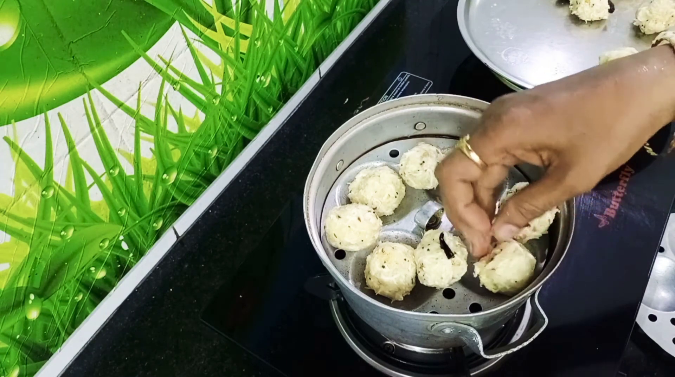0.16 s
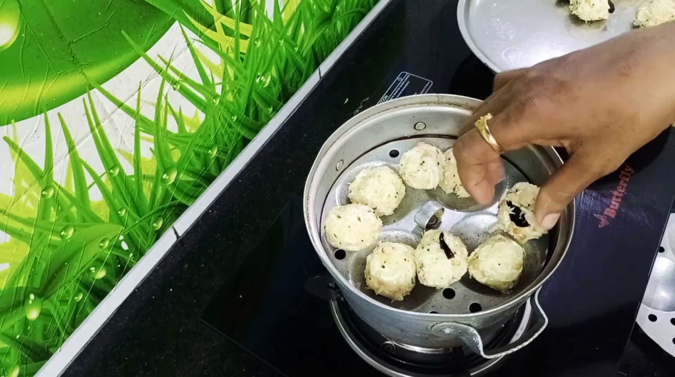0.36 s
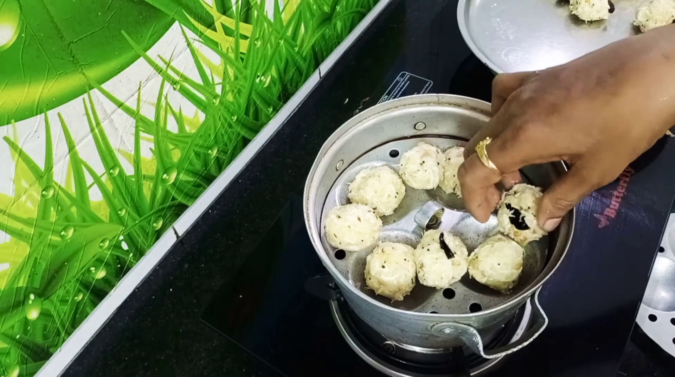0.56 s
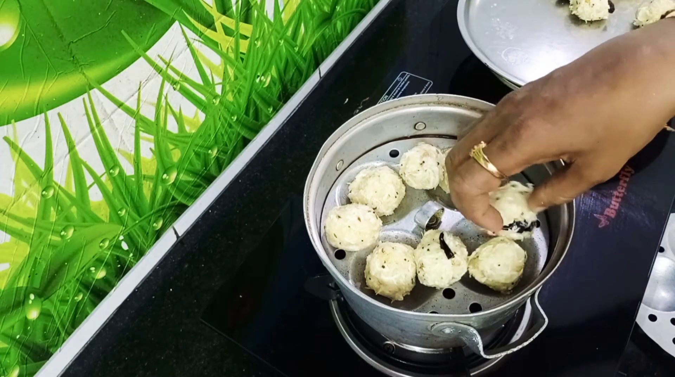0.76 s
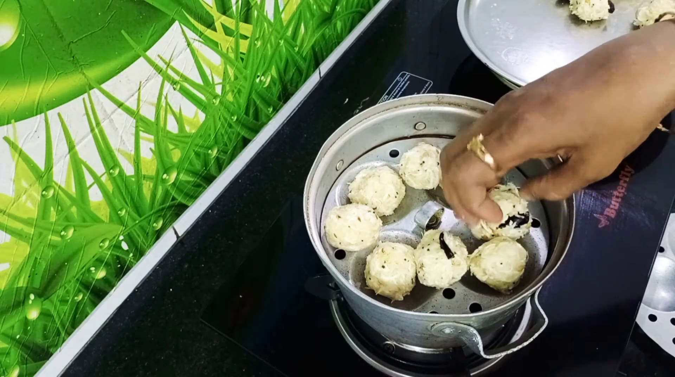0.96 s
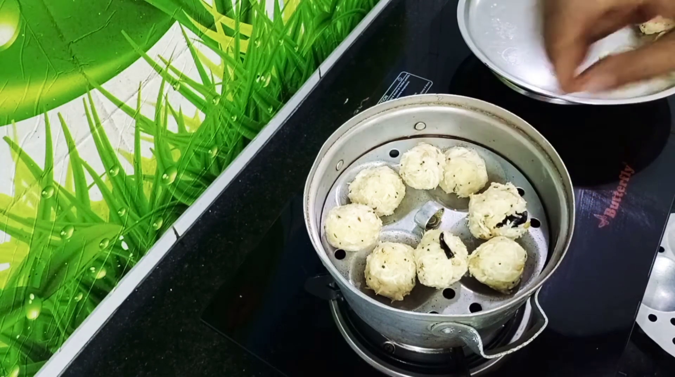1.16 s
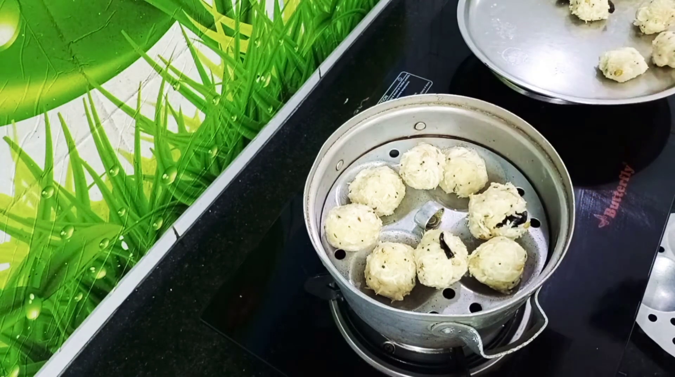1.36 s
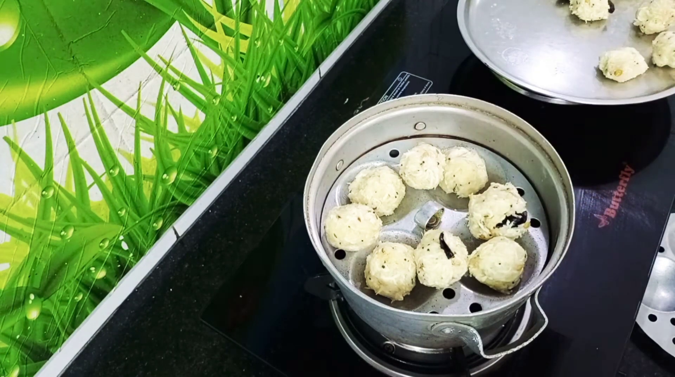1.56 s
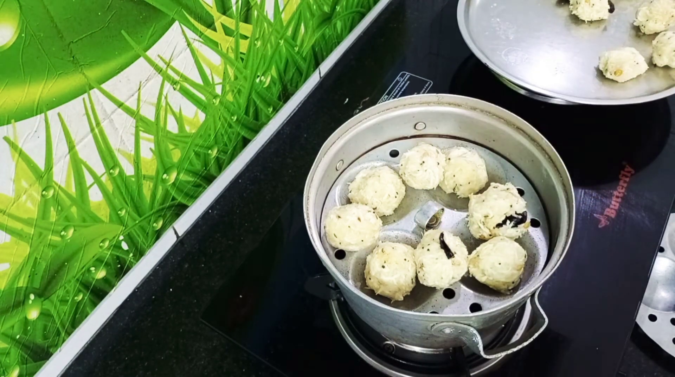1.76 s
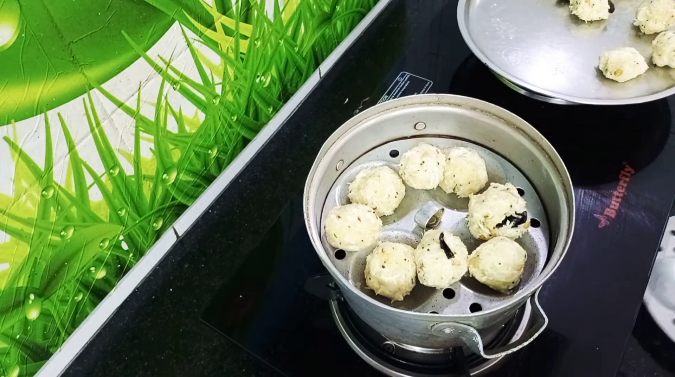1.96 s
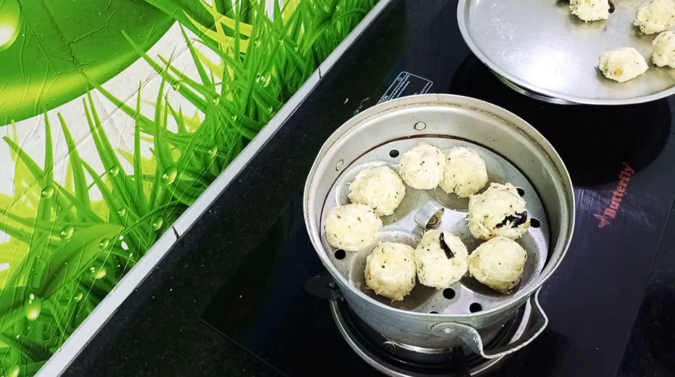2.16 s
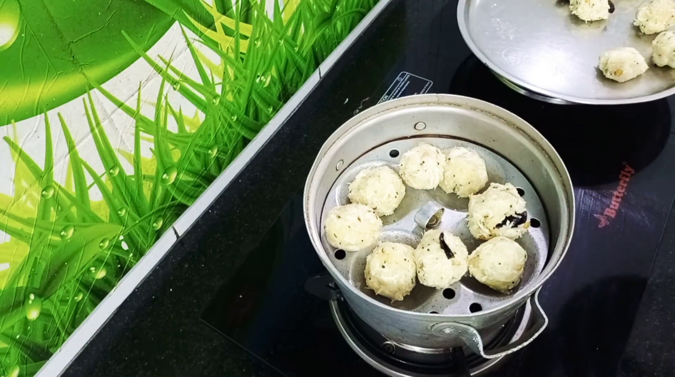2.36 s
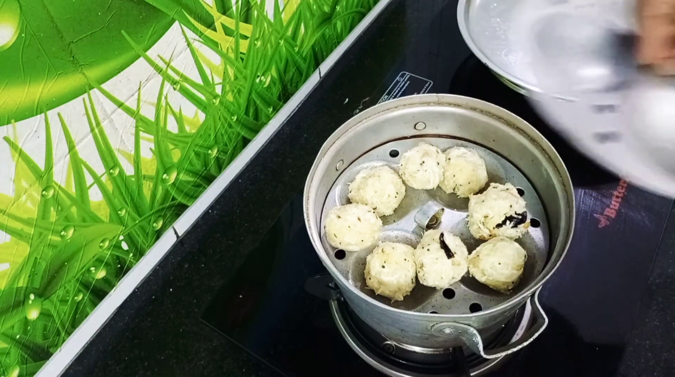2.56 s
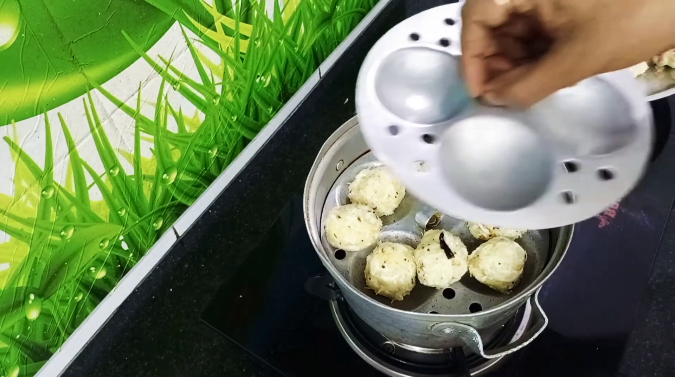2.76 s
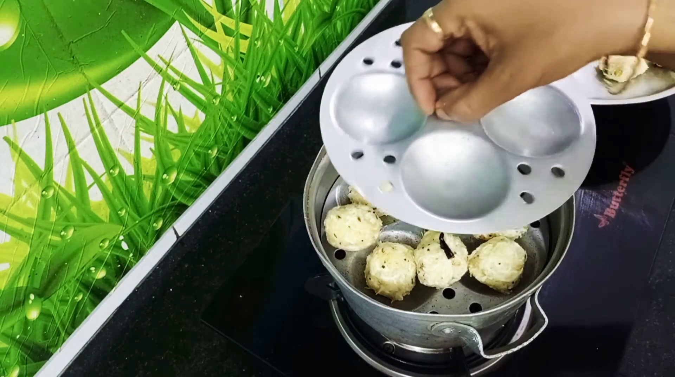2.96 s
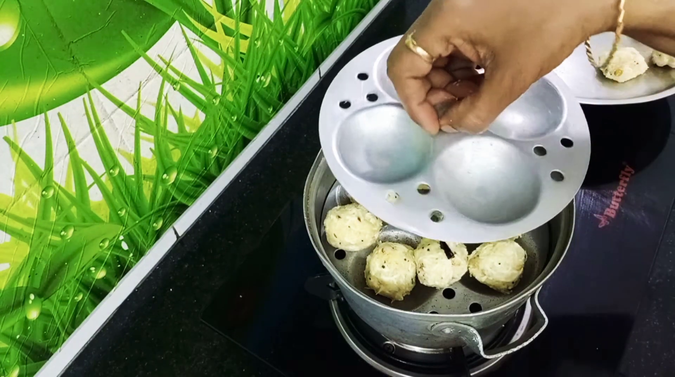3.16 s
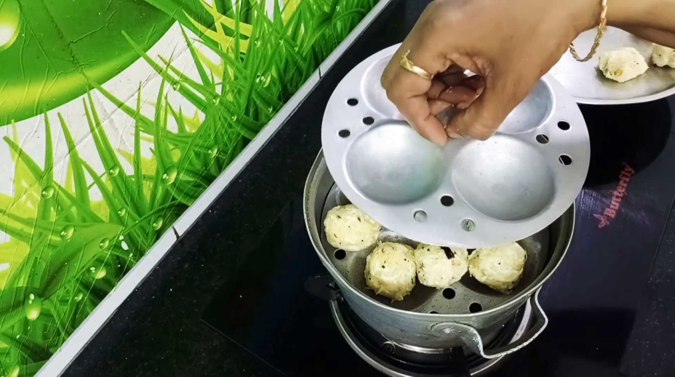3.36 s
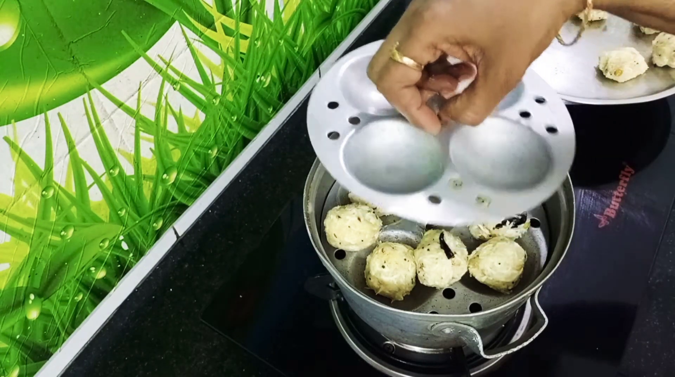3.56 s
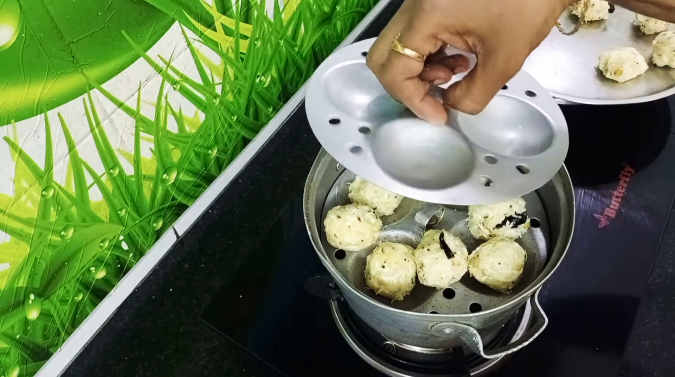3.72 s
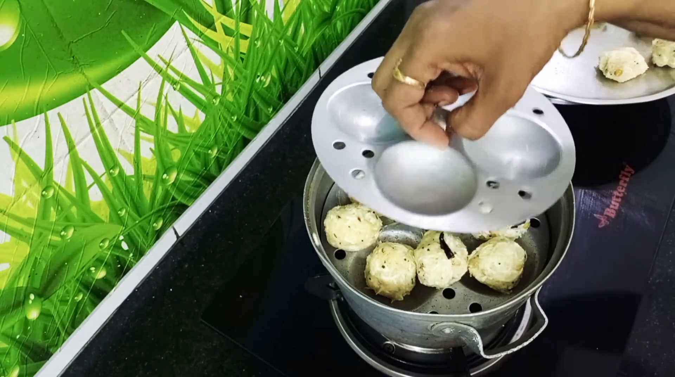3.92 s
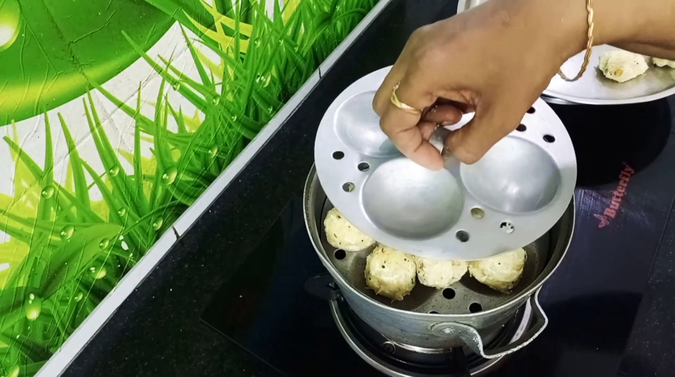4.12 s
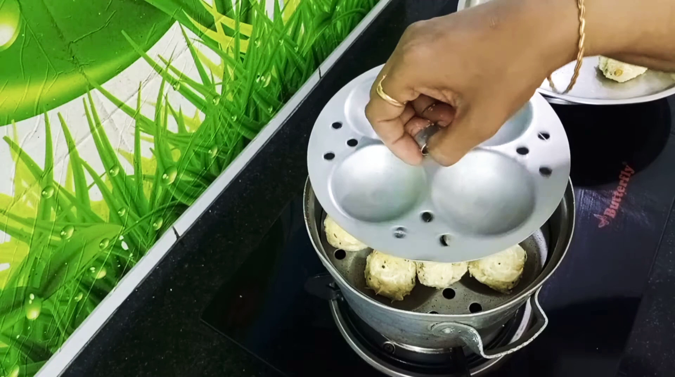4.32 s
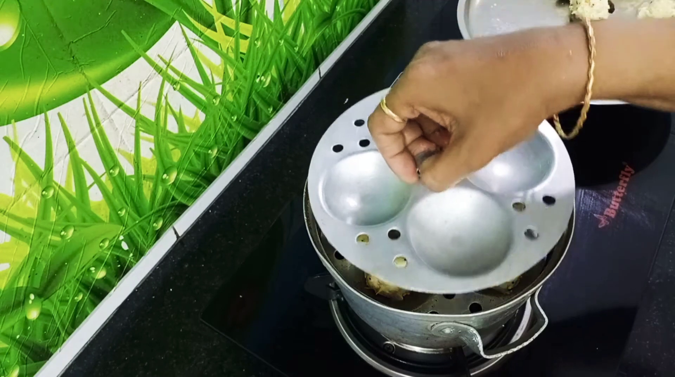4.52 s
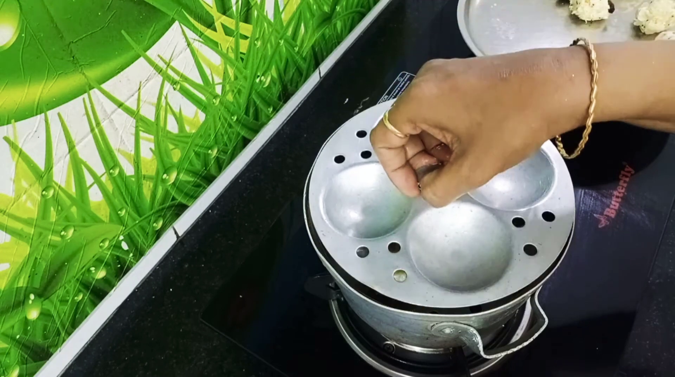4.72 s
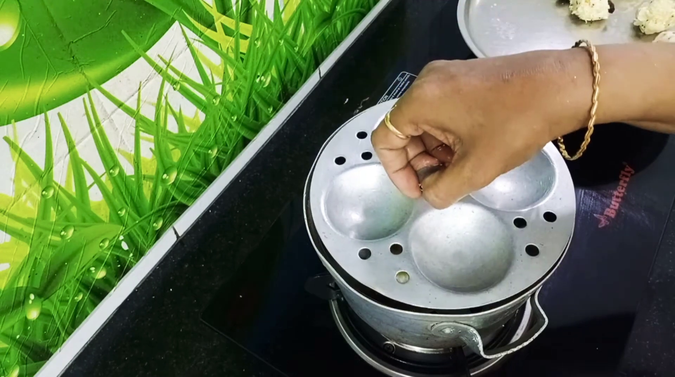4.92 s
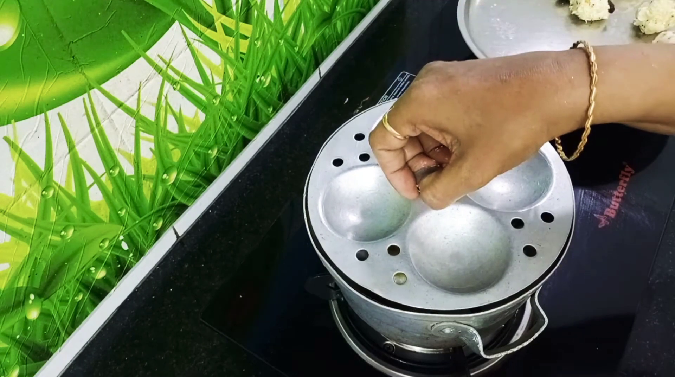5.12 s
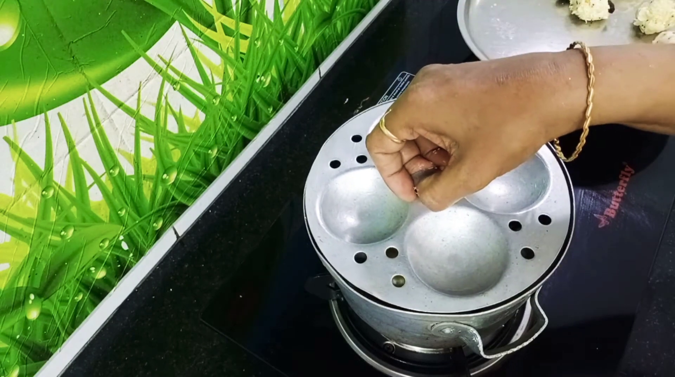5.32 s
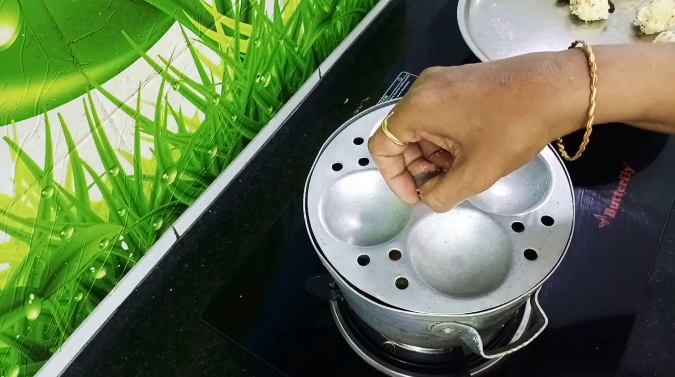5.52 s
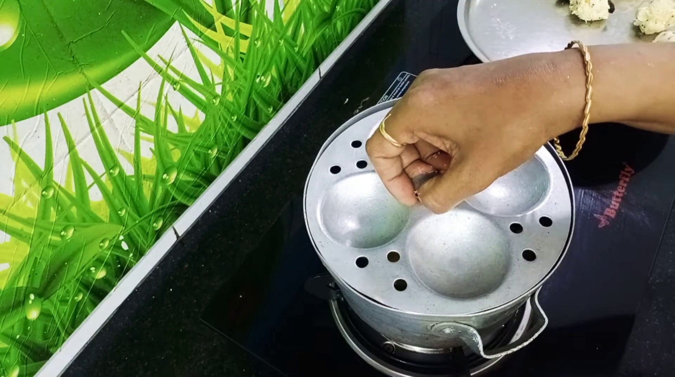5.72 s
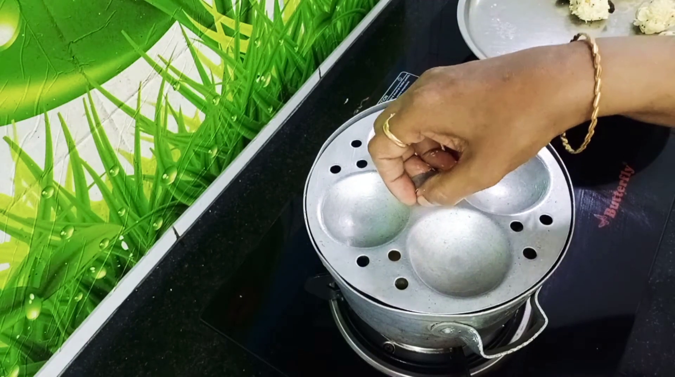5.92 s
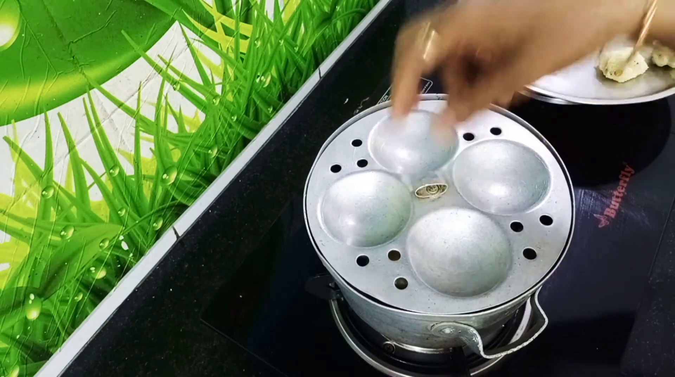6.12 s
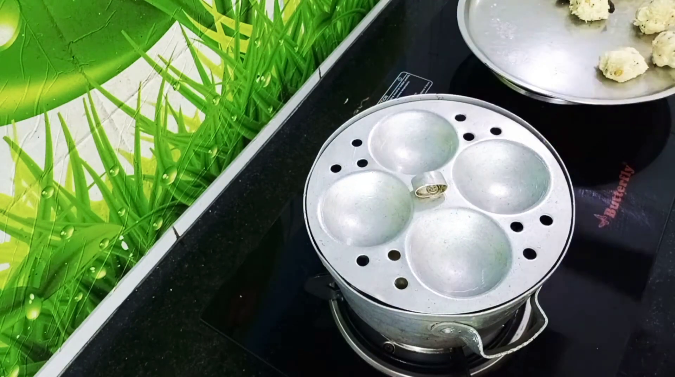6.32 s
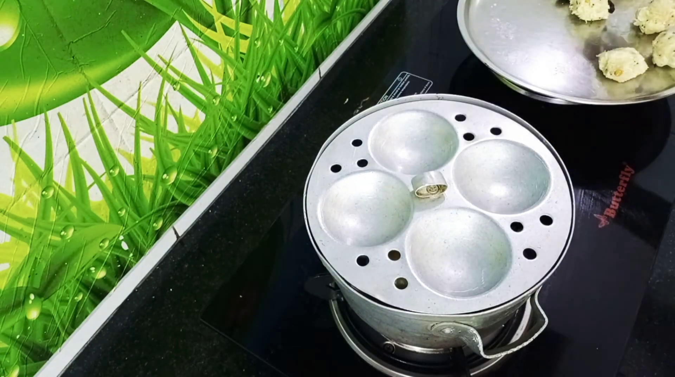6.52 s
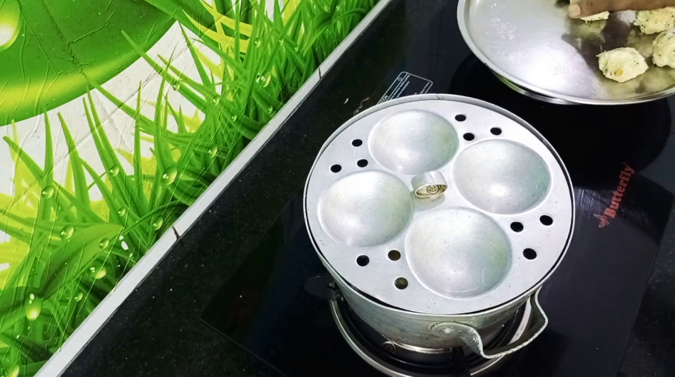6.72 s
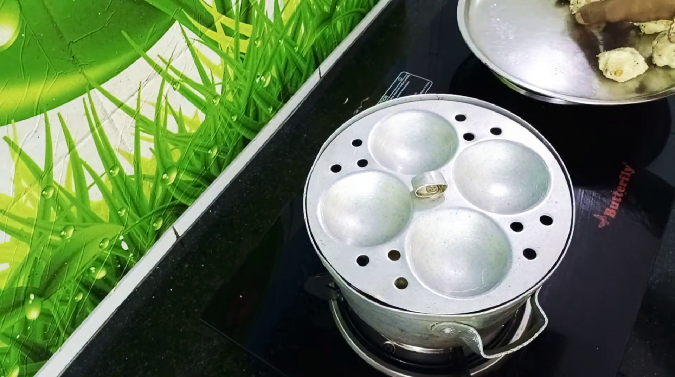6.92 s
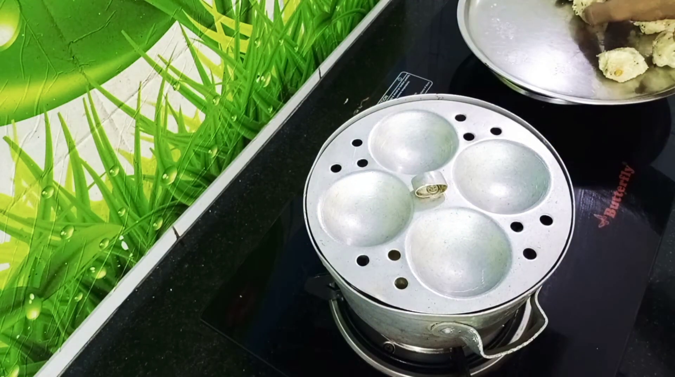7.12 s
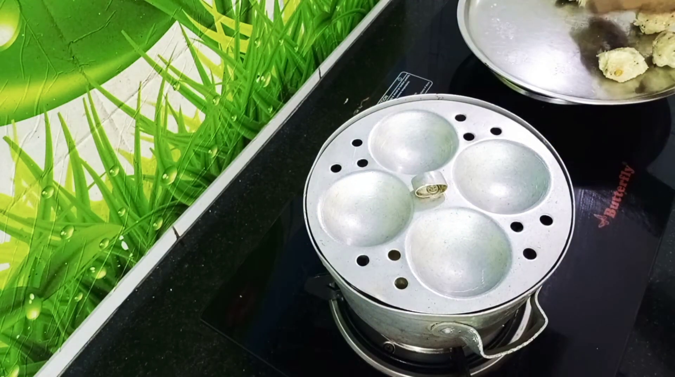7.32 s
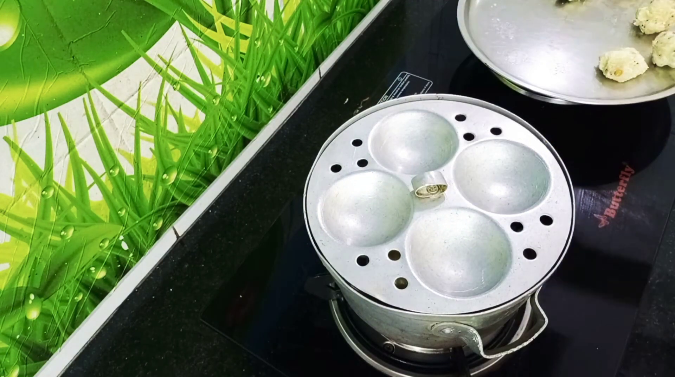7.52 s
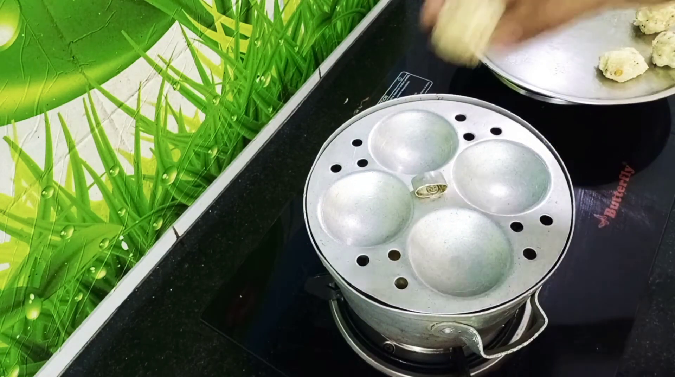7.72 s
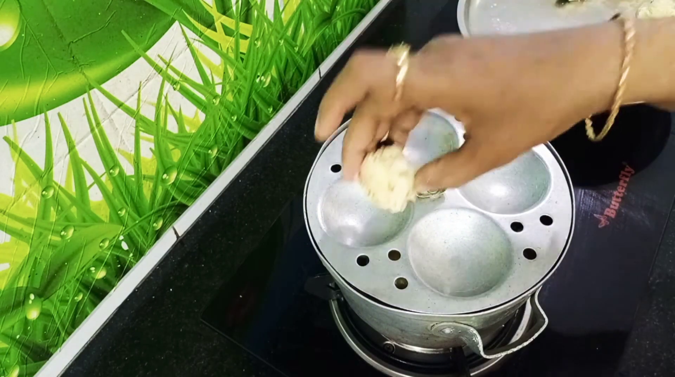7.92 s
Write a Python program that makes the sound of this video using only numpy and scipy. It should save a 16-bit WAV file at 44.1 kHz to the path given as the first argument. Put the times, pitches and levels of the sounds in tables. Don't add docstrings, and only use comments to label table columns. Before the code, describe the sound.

In a quiet kitchen, sheet metal rings out sharply, lands on a pot with a shorter clank, and is nudged into place with small knocks.

```python
import sys
import numpy as np
from scipy import signal
from scipy.fft import rfft, irfft, next_fast_len
from scipy.io import wavfile
from scipy.ndimage import uniform_filter1d

SR = 44100
rng = np.random.default_rng(int(sys.argv[2]) if len(sys.argv) > 2 else 0)


def how_loud(loudness_db):
    steps = np.asarray(loudness_db, float) / 20
    return 10 ** steps


def put_to_file(sound):
    columns = np.atleast_2d(sound).T
    safe = np.clip(columns, -1, 1)
    whole_steps = np.round(safe * 32767)
    wavfile.write(sys.argv[1], SR, whole_steps.astype(np.int16))


N = 351735

# frequency in Hz, level in dB per Hz.
FREE_OVERTONES = [(60, -49.5), (110, -31), (250, -29), (400, -18), (630, -25.5), (800, -13), (1100, -26),
                  (1400, -9), (2500, -13.5), (3320, -20.5), (3700, -18.5), (7700, -11.5), (8200, -20.5),
                  (15500, -29)]
# frequency in Hz, level in dB per Hz.
RIM_OVERTONES = [(60, -44.5), (110, -25.5), (420, -42.5), (580, -8), (900, -26), (1250, -29), (1500, -10),
                 (2000, -7), (2900, -22.5), (3300, -8.5), (3600, -19.5), (7500, -16), (8300, -34),
                 (15500, -27.5)]


def evened(x):
    return x / np.sqrt(np.mean(x ** 2) + 1e-20)


def read(points, hz):
    f, value = np.transpose(points)
    return np.interp(np.log(hz + 1), np.log(f + 1), value)


def add(mix, s, sound):
    part = mix[round(s * SR):][:len(sound)]
    part += sound[:len(part)]


def resonate(x, hz, width):
    turn = np.exp(2j * np.pi * np.cumsum(hz * np.ones(len(x))) / SR)
    r = np.exp(-np.pi * width / SR)
    return 2 * (turn * signal.lfilter([1 - r], [1, -r], x / turn)).real


def resonate_twice(x, hz, width):
    return resonate(resonate(x, hz, width), hz, width)


def coloured(points, count):
    hz = np.fft.rfftfreq(count, 1 / SR)
    return evened(irfft(rfft(rng.standard_normal(count)) * how_loud(read(points, hz)), count))


def dying(x, t60s):
    hz, t, z = signal.stft(x, SR, nperseg=256)
    decay = how_loud(-60 * t / read(t60s, hz)[:, None])
    return signal.istft(z * decay, SR, nperseg=256)[1][..., :x.shape[-1]]


def smoothed(z, bins, frames):
    return uniform_filter1d(uniform_filter1d(z, bins, 0), frames, 1)


def patchy(frames, depth_db):
    a, b, patches = rng.standard_normal((frames, 513, 3)).T
    return (a + 1j * b) * how_loud(depth_db * evened(smoothed(patches, 6, 9)))


def steam_and_air():
    # frequency in Hz, level in dB per Hz.
    air = [(100, -25), (180, -17), (300, -15.5), (600, -25), (1000, -23), (5600, -36.5), (9000, -41.5),
           (15300, -38)]
    # frequency in Hz, level in dB per Hz.
    hiss = [(5900, -37.5), (6300, -8), (7050, -1), (7700, -8.5), (8100, -19.5), (8700, -50)]
    # time in seconds, level in dB.
    hiss_level = [(0.0, -73.5), (2.131, -70.5), (2.27, -65.5), (2.69, -72), (4.24, -72.5), (4.69, -70),
                  (5.64, -69), (6.28, -73), (6.69, -70.5), (7.98, -71)]
    gusts_db = 1.5
    frames, hz = N // 256 + 5, np.fft.rfftfreq(1024, 1 / SR)[:, None]
    hiss_level_db = np.interp(np.arange(frames) * 256 / SR, *np.transpose(hiss_level))
    gusts = evened(smoothed(rng.standard_normal((frames, 513)).T, 14, 20))
    steam = how_loud(read(hiss, hz) + hiss_level_db + 18.0 + gusts_db * gusts)
    steam = steam * (hz > 5900) * (hz < 8700)
    z = patchy(frames, 1.0) * np.hypot(how_loud(read(air, hz) - 43.0), steam) * how_loud(-29.5)
    return signal.istft(z, nperseg=1024, noverlap=768)[1][:N]


def hum():
    # frequency in Hz, level in dB per Hz.
    spectrum = [(30, -46), (55, -35.5), (75, -8), (90, 0), (112, 0.5), (160, -9), (260, -24), (400, -50)]
    # time in seconds, level in dB.
    load = [(0.0, -80), (1.26, -75), (1.78, -76.5), (2.06, -70), (2.2, -74.5), (2.42, -80.5), (3.08, -77.5),
            (3.53, -79.5), (4.22, -77.5), (4.53, -77.5), (4.88, -76.5), (5.39, -84), (5.77, -77),
            (6.37, -73), (6.75, -78.5), (7.26, -76.5), (7.48, -77.5), (7.97, -77.5)]
    lumps_db = 2
    lumps = evened(uniform_filter1d(uniform_filter1d(rng.standard_normal(N), 2000), 2000))
    load_db = np.interp(np.arange(N) / SR, *np.transpose(load))
    return coloured(spectrum, next_fast_len(N))[:N] * how_loud(load_db + 1.5 + lumps_db * lumps)


def fan():
    return how_loud(-87) * evened(resonate(rng.standard_normal(N), 506.6, 5.8))


def brushes():
    # frequency in Hz, level in dB.
    lift_rings = [(1596, -61), (2833, -66.5), (3650, -68.5), (4600, -71), (5450, -68.5), (6225, -62)]
    # start in seconds, length in seconds, frequency in Hz, level in dB.
    rubs = [(2.012, .03, 3399, -59.5), (2.031, 0.049, 3642, -62), (2.502, 0.08, 3850, -72),
            (2.605, .09, 3530, -67), (2.614, .08, 3730, -67), (3.035, .1, 3500, -68),
            (3.049, .1, 3720, -66), (4.255, 0.089, 3550, -63), (4.511, 0.15, 3520, -65.5),
            (5.035, 0.1, 3593, -60), (5.515, 0.1, 3670, -66.5), (5.728, 0.052, 3453, -63)]
    # start in seconds, length in seconds, frequency in Hz, level in dB.
    touches = [(1.17, 0.062, 1604, -73.5), (1.51, 0.073, 5500, -76), (.54, .07, 3500, -74),
               (3.52, .08, 5500, -79), (7.53, .06, 3500, -78), (7.53, .06, 5500, -77),
               (2.63, .08, 1028, -77), (4.509, .05, 4600, -73.5), (4.99, 0.13, 5470, -72.5),
               (5.521, .05, 249, -62), (5.772, 0.072, 106.4, -58), (6.657, 0.11, 331, -67),
               (6.945, .045, 1535, -71), (7.015, .05, 1540, -70), (7.06, .1, 1530, -73),
               (6.515, .07, 495, -67), (4.97, 0.15, 570, -66), (7.53, 0.22, 1190, -73),
               (7.66, 0.13, 1070, -73), (7.76, 0.14, 1160, -73), (7.86, .11, 1040, -73)]
    lift_s, lift_length_s, lift_lag_s, lift_shorten = 1.94, 0.059, 0.015, 0.5
    out, lift = np.zeros(N), []
    lowest_hz = lift_rings[0][0]
    for hz, db in lift_rings:
        start = lift_s + lift_lag_s * np.log(hz / lowest_hz)
        lift.append((start, lift_length_s * (lowest_hz / hz) ** lift_shorten, hz, db))
    for s, length, hz, db in list(lift) + list(rubs) + list(touches):
        noise, count = rng.standard_normal(SR // 4), round(length * SR)
        tone = evened(resonate_twice(noise, hz, 30 + 0.03 * hz))[-count:]
        stroke = signal.windows.tukey(count, .5) * how_loud(-8 * np.arange(count) / count)
        add(out, s, how_loud(db) * tone * stroke)
    return out


def ticks():
    # start in seconds, peak level in dB, centre frequency in Hz.
    rebounds = [
        (2.0972, -16, 7800),
        (2.0988, -21, 7800),
        (4.7415, -19, 6800),
        (4.7492, -27, 7500),
        (4.7594, -27, 7000),
        (4.7695, -23, 6500),
        (4.7762, -31, 7000),
        (5.5315, -42, 1800),
        (5.7135, -38, 6500),
        (1.082, -66, 14000),
    ]
    decay_s, width_hz = .0005, 3200
    out, t = np.zeros(N), np.arange(400) / SR
    for s, db, hz in rebounds:
        click = np.gradient(rng.standard_normal(len(t)) * np.exp(-t / decay_s))
        click = resonate_twice(click, hz, width_hz)
        add(out, s, how_loud(db) * click / abs(click).max())
    return out


def knock(blows, modes, overtones, split, hold):
    # frequency in Hz, t60 in seconds.
    crack_t60 = [(200, 0.11), (1000, 0.021), (4000, 0.023), (9000, 0.045), (15000, 0.028)]
    wobble_rad, wobble_per_s = 1.4, 14
    out, full = np.zeros((2, N)), np.arange(round(1.6 * SR)) / SR
    rise = 1 - np.exp(-full / 0.00082)
    for s, blow_db, crack_db, choke_db in blows:
        after = out[:, round(s * SR):][:, :len(full)]
        after *= how_loud(choke_db * np.minimum(full / .002, 1))
        if blow_db < -90:
            continue
        for (hz, db, t60), (turn, twin, sway, lag, near) in zip(modes, rng.random((len(modes), 5))):
            t60 = t60 * hold
            t = full[:round(SR * t60 * min(1 + (blow_db + db + 25) / 100, 1))]
            flex = np.sin(2 * np.pi * (wobble_per_s * (.5 + near) * t + sway))
            flex = (split > .001) * wobble_rad * np.minimum(3 * t / t60, 1) * flex
            pair = np.sin(2 * np.pi * hz * t + flex)
            pair += 0.33 * np.sin(2 * np.pi * (hz * (1 + split * (twin - .5)) * t + turn))
            third = np.sin(2 * np.pi * (hz * (1 + 4 * split * (near - .5)) * t + lag))
            pair += 0.4 * third * how_loud(-30 * t / t60)
            swing = (0.13 + sway) * 0.31 * np.sqrt(hz) * t * (1 + 0.5 * t)
            swing_db = 3.5 * np.sin(2 * np.pi * (swing + lag)) * min(hz / 2200, 1)
            hard_db = 0.036 * blow_db * hz / 1000
            level_db = blow_db + db + hard_db + swing_db - 60 * t / t60
            add(out[0], s, rise[:len(t)] * how_loud(level_db) * pair)
        crack = dying(coloured(overtones, SR // 4), crack_t60)
        add(out[1], s, how_loud(crack_db) * rise[:SR // 4] * crack)
    return out


def free_plate():
    # time in seconds, blow in dB, crack in dB, change of the earlier ring in dB.
    blows = [
        (2.0925, -3, -16.5, 0),
        (2.0965, -33, -31, 2),
        (2.144, -36.5, -23, 3),
        (2.18, -99, -99, -1),
        (2.47, -99, -99, -9),
    ]
    # frequency in Hz, level in dB, t60 in seconds.
    modes = [(380, -45, .4), (745, -31, .13), (778, -29, 0.33), (935, -45, .4), (1272, -41, 0.45),
             (1326, -24, 0.36), (1343, -29, .5), (1383, -40, 0.45), (1408, -34, .38), (1581.4, -35, 0.75),
             (1584, -40, .7), (1365, -36, .4), (1700, -45, .3), (1836, -47, .35), (2290, -46, .3),
             (2972, -48, .3), (3545, -52, .5), (3650, -54, .8), (4081, -47, .3), (4716, -48, .4),
             (4872, -54, .35), (1766, -40, 0.55), (2778, -29, 0.26), (2848, -29, 0.47), (3740, -35, 0.52),
             (3856, -43, 0.55), (4161, -43, 0.4), (4366, -35, 0.37), (4655, -30, 0.52), (5342, -41, 0.39),
             (5519, -36, 0.45), (5593, -46, 0.4), (6165, -26, 0.26), (6498, -34, 0.4), (6534, -31, 0.49),
             (7104, -35, 0.42), (7160, -42, 0.55), (7438, -34, 0.36), (7851, -36, 0.37), (7889, -33, 0.37),
             (8426, -43, 0.41), (8469, -42, 0.44), (8625, -44, 0.4), (9074, -48, 0.42), (9118, -47, 0.45),
             (9344, -50, 0.46), (9760, -46, .21), (9997, -48, .2), (10640, -46, .36), (11020, -49, .3),
             (11910, -51, .3), (12480, -46, .24), (12890, -46, .2), (13250, -48, .28), (13870, -50, .28),
             (14410, -51, .28), (14590, -53, .3), (14980, -48, .25), (15250, -48, .25)]
    return knock(blows, modes, FREE_OVERTONES, split=0.012, hold=0.88)


def pot():
    # time in seconds, blow in dB, crack in dB, change of the earlier ring in dB.
    blows = [
        (2.093, -51, -73, 0),
        (2.85, -99, -99, 2.5),
        (3.0, -99, -99, -2.5),
        (3.13, -99, -99, -11),
    ]
    # frequency in Hz, level in dB, t60 in seconds.
    modes = [(486, 0, 3.6), (511, -14, 4.0), (560, -10, .25), (385, -22, .3), (530, -14, .3),
             (555, -19, 3.0)]
    return knock(blows, modes, FREE_OVERTONES, split=0.0002, hold=0.97)


def plate_on_rim():
    # time in seconds, blow in dB, crack in dB, change of the earlier ring in dB.
    blows = [
        (4.7385, 0.5, -18.5, 0),
        (4.771, -27, -31, -6.5),
        (4.8624, -22.5, -49, -3),
    ]
    # frequency in Hz, level in dB, t60 in seconds.
    modes = [(493, -46, 0.3), (910, -53, .35), (1168, -46, 0.32), (1398, -43, 0.5), (2196, -52, .4),
             (3106, -51, .27), (1436, -33, 0.37), (1501, -19.5, 0.42), (1580, -40, 0.75), (1814, -36, 0.7),
             (1897, -40, 0.4), (2110, -50, 0.35), (2842, -34, 0.38), (2800, -44, .35), (1470, -36, .45),
             (1535, -38, .45), (3527, -40, 0.34), (3568, -41, 0.4), (3632, -51, 0.55), (3741, -45, 0.3),
             (3852, -42, 0.27), (4090, -43, 0.29), (4164, -42, 0.26), (4656, -48, 0.48), (5437, -46, 0.3),
             (5514, -44, 0.28), (5600, -39, 0.25), (5902, -43, 0.27), (6165, -47, 0.37), (6694, -33, 0.34),
             (6739, -43, 0.31), (6776, -46, 0.3), (7156, -36, 0.28), (7430, -42, 0.36), (7873, -47, 0.29),
             (9722, -44, 0.24), (10827, -41, 0.2), (8480, -46, .2), (8624, -43, .16), (9039, -48, .25),
             (10370, -54, .25), (12450, -54, .24), (12830, -55, .25), (13600, -52, .2), (14680, -50, .12),
             (15110, -46, .15), (15200, -54, .18)]
    return knock(blows, modes, RIM_OVERTONES, split=0.015, hold=0.84)


def pot_wall():
    # time in seconds, blow in dB, crack in dB, change of the earlier ring in dB.
    blows = [
        (4.739, -36.5, -71, 7.5),
        (4.862, -46, -82, -10),
        (5.711, -53.5, -82, -9),
    ]
    # frequency in Hz, level in dB, t60 in seconds.
    modes = [(550, -10.5, 0.8), (547, -2.5, 0.19), (698, -17.5, 0.43)]
    return knock(blows, modes, RIM_OVERTONES, split=0.056, hold=0.63)


def drags():
    # start, hardest and end in seconds, level in dB,
    # pitch rise as a share as the plate bends.
    strokes = [
        (5.282, 5.331, 5.375, -54, 0.015),
        (5.374, 5.398, 5.47, -54, 0),
        (5.486, 5.53, 5.535, -56.5, 0.033),
        (5.651, 5.672, 5.708, -59.5, 0.0014),
    ]
    # frequency in Hz, level in dB.
    stroke_rings = [
        [(545, 12.5), (1500, -18), (3580, 7), (3880, 1), (5250, -17), (5850, -4), (6500, -4), (7503, -11),
         (8150, -3)],
        [(564, -5.5), (1500, -6.5), (2220, -12), (2890, -7.5), (3500, -6), (3900, -3), (4300, 2), (4650, -14),
         (5580, -6), (6560, 1), (7210, 1)],
        [(520, 1), (3600, -1.5), (5730, -5), (6720, -13)],
        [(558, 11.5), (2100, -3), (3900, 3), (4250, -10), (6300, -10), (6800, -10), (7440, -18)],
    ]
    edge_db, width_hz, damp = -15, 48, 0.024
    out = np.zeros(N)
    for (start, top, end, level_db, glide), rings in zip(strokes, stroke_rings):
        t = np.arange(start - .05, end, 1 / SR)
        size, chance, sign = rng.random((SR // 2, 3)).T[:, :len(t)]
        slips = how_loud(-3 * np.log(size + 0.0093)) * (chance < 2500 / SR) * np.sign(sign - .5)
        bend = 1 + glide * np.interp(t, [start, end], [-.5, .5])
        ring = np.zeros(len(t))
        for hz, db in rings:
            ring += how_loud(db) * evened(resonate_twice(slips, hz * bend, width_hz + damp * hz))
        rasp = resonate(resonate_twice(slips, 5000, 4500), 5000, 4500)
        press_db = np.interp(t, [start, top, end], [edge_db, 0, edge_db])
        level = uniform_filter1d(how_loud(level_db + press_db) * (t > start), 300)
        add(out, t[0], (evened(ring) + 0.12 * evened(rasp)) * level)
    return out


def nudges():
    # time in seconds, blow in dB, crack in dB, change of the earlier ring in dB.
    blows = [
        (5.250, -1, -45.5, 0),
        (5.3137, -20, -50.5, -3),
        (5.3735, -20, -69.5, -2),
        (5.39, -20, -64.5, 0.5),
        (5.403, -16, -58, 3),
    ]
    # frequency in Hz, level in dB, t60 in seconds.
    modes = [(536, -49.5, 0.177), (1185, -58, 0.13), (1504, -52, 0.14), (1830, -59.5, 0.22),
             (2110, -59, 0.22), (3800, -65, 0.18), (4360, -48, 0.064), (5450, -64, 0.2), (6200, -61, 0.12),
             (6684, -61, 0.23), (6818, -54, 0.27), (7228, -55.5, 0.2), (3200, -68, 0.14),
             (5280, -54, 0.096), (5870, -54, 0.075)]
    # frequency in Hz, level in dB per Hz.
    overtones = [(200, -26.5), (560, -5.5), (870, -22), (1400, 7), (2100, -7), (2700, -5), (4300, -11),
                 (4850, -10), (5700, -3.5), (7000, 1), (9000, -17), (13000, -53)]
    return knock(blows, modes, overtones, split=0.023, hold=0.98)


def seating():
    # time in seconds, blow in dB, crack in dB, change of the earlier ring in dB.
    blows = [
        (5.5215, -1, -45.5, 0),
        (5.531, -10, -48.5, -1.2),
    ]
    # frequency in Hz, level in dB, t60 in seconds.
    modes = [(582, -47, 0.19), (685, -61, 0.31), (1040, -62, 0.37), (1246, -53, 0.25), (1415, -41, 0.15),
             (1510, -45, 0.22), (1880, -53, 0.15), (2044, -57, 0.15), (3600, -65, 0.21), (3500, -67, 0.23),
             (3897, -69, 0.25), (6946, -64, 0.28), (254, -50.5, 0.16), (2844, -61, 0.16), (4250, -62, .2),
             (4390, -64, .15), (5400, -54, 0.06)]
    # frequency in Hz, level in dB per Hz.
    overtones = [(88, -41), (150, -10), (416, -10), (591, 0.5), (1110, -19.5), (1470, -2), (2130, -14.5),
                 (2290, -20), (4400, -16.5), (10000, -52.5), (13000, -68.5)]
    return knock(blows, modes, overtones, split=0.024, hold=0.83)


def snap():
    # time in seconds, blow in dB, crack in dB, change of the earlier ring in dB.
    blows = [
        (5.663, -18.5, -67.5, 0),
        (5.711, -2.5, -37, -0.99),
    ]
    # frequency in Hz, level in dB, t60 in seconds.
    modes = [(1007, -58, 0.31), (1220, -49.5, 0.15), (1450, -46.5, 0.15), (1840, -56.5, 0.25),
             (3630, -53, 0.34), (4200, -53, 0.19), (4450, -62, 0.18), (4570, -49.5, 0.13),
             (6780, -60.5, 0.16), (6460, -53.5, 0.19), (7030, -42, 0.12), (7200, -59.5, 0.26),
             (7370, -58.5, 0.25), (7910, -50, 0.12), (601, -54, 0.19), (2160, -63, 0.23),
             (2760, -58.5, 0.19), (5100, -56, 0.093), (5770, -47, 0.1)]
    # frequency in Hz, level in dB per Hz.
    overtones = [(120, -48), (200, -35), (580, -0.5), (867, -7), (1190, 5), (2040, -10.5), (2310, -11.5),
                 (3510, -14), (6930, -2), (13000, -53)]
    return knock(blows, modes, overtones, split=0.06, hold=1.0)


def tray():
    # start in seconds, length in seconds, level in dB,
    # slope in dB per octave over 3 kHz, rise as a share of length.
    pulls = [
        (6.413, 0.064, -64.5, -18, 0.095),
        (6.768, 0.08, -53, 4.5, 0.048),
        (6.859, 0.046, -71, -5, 0.3),
    ]
    # frequency in Hz, level in dB per Hz.
    colour = [(120, -48), (200, -34), (349, 1), (620, -18), (800, -11), (1140, -18.5), (1490, -9),
              (2600, -9.5), (3800, -12), (4800, -18.5), (6000, -20), (7200, -11.5), (9000, -40),
              (11700, -68.5)]
    # frequency in Hz, width in Hz, level in dB.
    tray_rings = [(1490, 80, 1.5), (1910, 120, -5), (2360, 18, -4.5), (2620, 40, -4.5), (2936, 120, 1.5),
                  (3520, 66, -5), (3806, 16, -6.5), (4550, 70, -13.5), (4740, 33, -14.5)]
    out, count = np.zeros(N), SR // 4
    hz = np.fft.rfftfreq(count, 1 / SR)
    rings = 1 + 1.9 * sum(how_loud(db) / (1 + ((hz - f) / (40 + width)) ** 2) for f, width, db in tray_rings)
    for s, length, db, dull_db, rise in pulls:
        u = np.arange(count) / SR / length
        grain = how_loud(3.3 * evened(uniform_filter1d(rng.standard_normal(len(u)), 150)))
        dull = how_loud(dull_db * np.log2(np.maximum(hz / 3000, 1)))
        smear = evened(irfft(rfft(coloured(colour, count)) * rings * dull, count)) * grain
        add(out, s, how_loud(db) * smear * (1 - np.exp(-u / rise)) * np.exp(-2.2 * u ** 3))
    return out


def kitchen(x):
    # frequency in Hz, t60 in seconds.
    room_t60 = [(200, 0.35), (1000, 0.44), (4000, 0.39), (12000, 0.2)]
    taps = np.zeros(SR)
    at = np.arange(200, SR - 20, 20)
    taps[at + rng.integers(0, 20, len(at))] = rng.choice([-1., 1.], len(at))
    tail = dying(taps, room_t60)
    return signal.fftconvolve(x, tail / np.linalg.norm(tail))[:N]


def scene():
    background = steam_and_air() + hum() + fan()
    soft = brushes() + drags() + tray()
    ring, crack = free_plate() + pot() + plate_on_rim() + pot_wall() + nudges() + seating() + snap()
    crack = crack + ticks()
    wet = kitchen(how_loud(-12.5) * ring + how_loud(-3.5) * crack + how_loud(-7.5) * soft)
    field = ring + crack + soft + wet + how_loud(8.5) * background
    across = how_loud(-19) * kitchen(how_loud(-6.5) * ring + crack + soft)
    return np.array([field + across, field - across])


def suppression(z):
    power = smoothed(abs(z) ** 2, 5, 5)
    quiet = np.percentile(power, 40, axis=1, keepdims=True)
    keep = np.maximum(1 - 2.4 * quiet / (power + 1e-20), how_loud(-5.5))
    return uniform_filter1d(keep, 3, 1)


def band_limit(x):
    return signal.sosfilt(signal.butter(12, 16820, fs=SR, output="sos"), x)


def record(dry):
    # frequency in Hz, difference in dB.
    tilt = [(60, 3), (200, 3.7), (500, 4.5), (1200, 6.5), (2500, 4.3), (4300, 4), (6300, 0), (7500, -5),
            (8300, -13), (10800, -15), (12200, -7), (13500, 3), (15000, -4)]
    # frequency in Hz, level in dB.
    side_share = [(100, -4.5), (1000, -10), (4000, -6), (9000, -1.5), (15000, -6)]
    # frequency in Hz, level in dB.
    capsule = [(60, -22), (300, -9), (1500, -1.5), (4000, 0), (7000, -1.5), (15300, -6.5)]
    # frequency in Hz, gain in dB.
    limits = [(30, -2), (60, 0), (15330, 0), (15600, -38), (16800, -36), (16900, -80)]
    hz, t, z = signal.stft(dry.mean(0), SR, nperseg=1024, noverlap=768)
    across = signal.stft(dry[0] - dry[1], SR, nperseg=1024, noverlap=768)[2]
    across = across * how_loud(read(side_share, hz))[:, None]
    ratio = how_loud(read(tilt, hz))[:, None]
    pair = np.array([2 * ratio / (1 + ratio), 2 / (1 + ratio)]) * z * suppression(z)
    noise = np.array([patchy(len(t), 1.4), patchy(len(t), 0.98)])
    pair += noise * how_loud(read(capsule, hz) - 100.0)[:, None]
    pair += np.array([across, -across])
    steered = signal.istft(pair, SR, nperseg=1024, noverlap=768)[1][:, :N]
    size = next_fast_len(N)
    gain = how_loud(read(limits, np.fft.rfftfreq(size, 1 / SR)))
    limited = irfft(rfft(steered, size) * gain, size)[:, :N]
    return band_limit(limited)


dry = scene()
out = record(dry)
put_to_file(out)
```